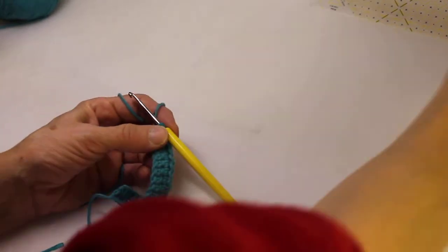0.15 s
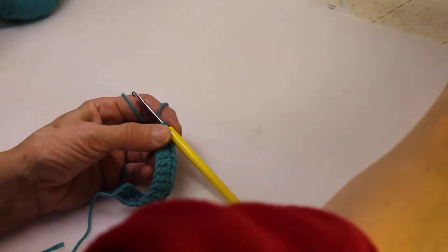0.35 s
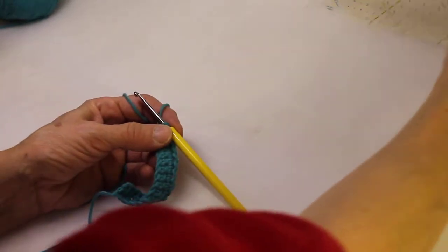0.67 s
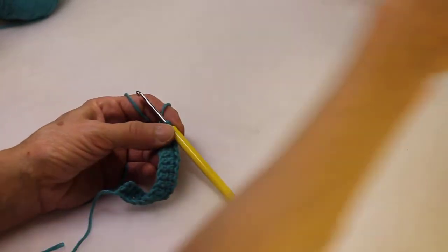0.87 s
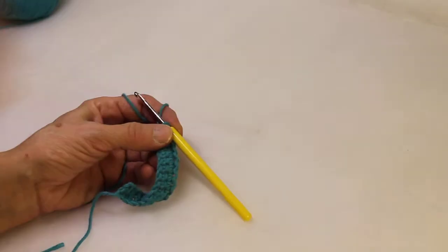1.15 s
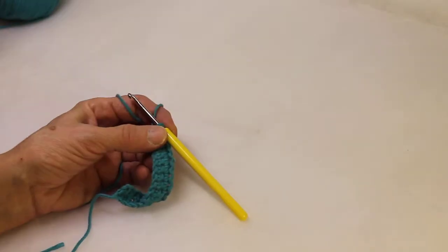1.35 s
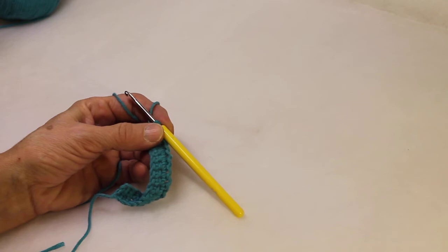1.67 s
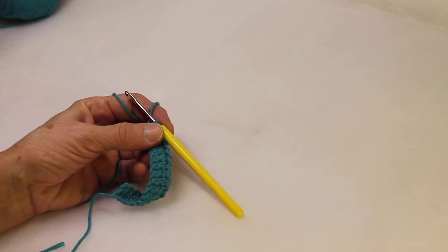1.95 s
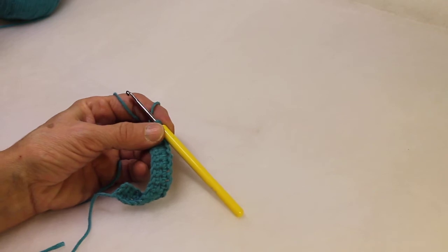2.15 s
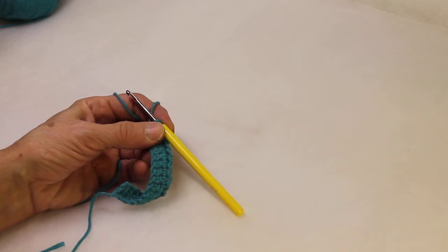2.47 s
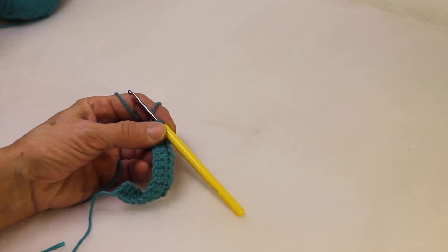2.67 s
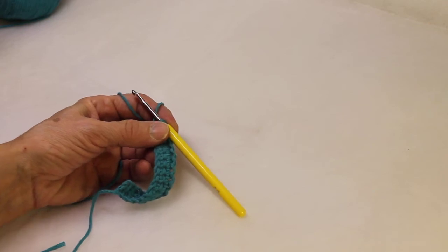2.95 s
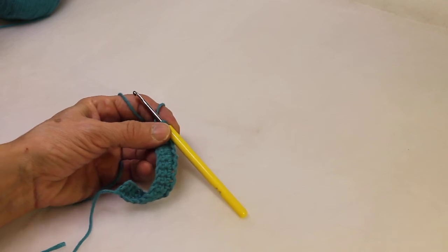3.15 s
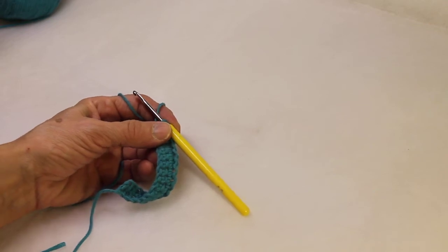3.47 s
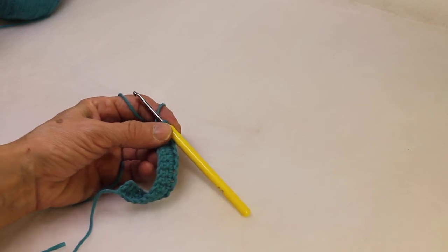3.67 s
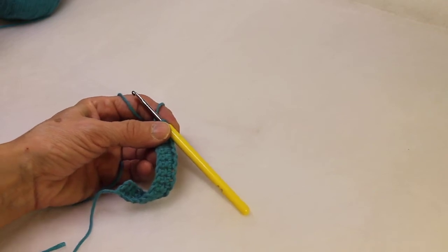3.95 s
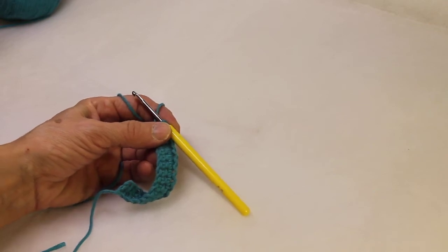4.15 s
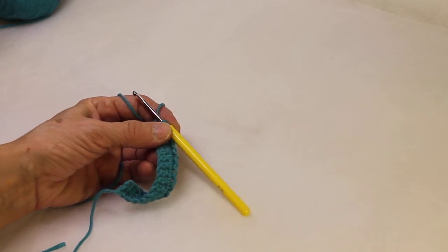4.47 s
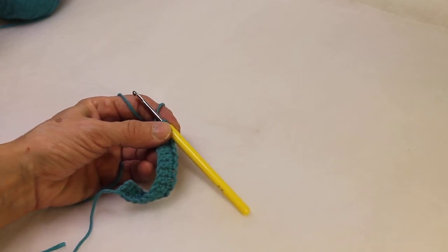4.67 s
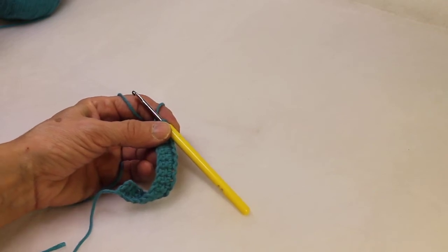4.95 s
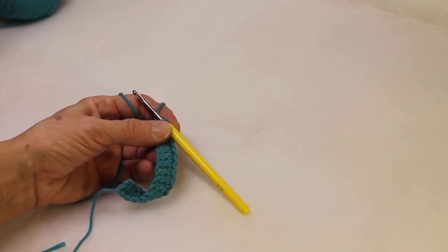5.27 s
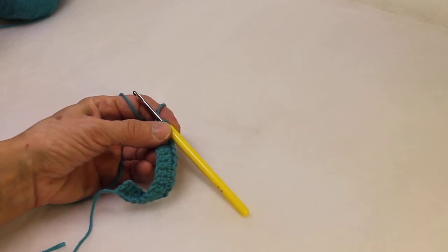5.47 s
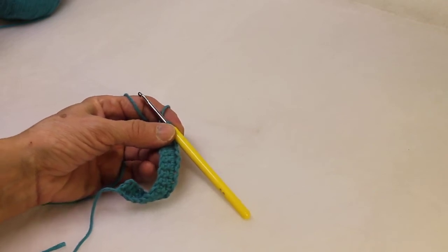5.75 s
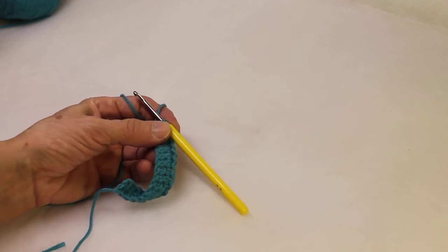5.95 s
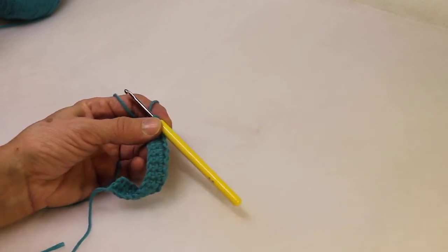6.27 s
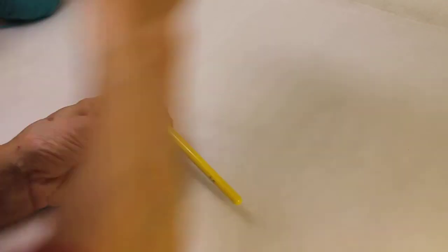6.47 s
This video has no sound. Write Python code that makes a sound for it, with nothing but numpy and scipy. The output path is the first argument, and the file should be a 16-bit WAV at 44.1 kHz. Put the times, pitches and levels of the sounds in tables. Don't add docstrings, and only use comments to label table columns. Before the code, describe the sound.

A microphone on a table picks up dry ticks, brushing fabric and a loud brief plastic catch snap, all very close. The sounds thin into quiet hiss, broken by two hard, roomy knocks with hollow rattling and a bright tiny bounce. A short slide follows, then two duller knocks, soft swelling yarn rustles and scattered little scrapes with short indoor reverberation. It grows nearly still before a last low tap.

```python
import sys
import numpy as np
from scipy import signal
from scipy.io import wavfile
from scipy.ndimage import uniform_filter1d

SR = 44100
rng = np.random.default_rng(int(sys.argv[2]) if len(sys.argv) > 2 else 0)


def transcribe(u):
    v = np.clip(np.atleast_2d(u).T, -1, 1)
    q = np.round(v * 32767).astype(np.int16)
    wavfile.write(sys.argv[1], SR, q)


def nominal_scale(level):
    x = np.asarray(level, float) / 20
    return 10 ** x


N = 291501


def evened(x):
    return x / np.sqrt(np.mean(x ** 2) + 1e-20)


def unit(x):
    return x / np.linalg.norm(x)


def peaked(x):
    return x / np.abs(x).max()


def read(points, hz):
    f, value = np.transpose(points)
    return np.interp(np.log(hz + 1), np.log(f + 1), value)


def add(mix, s, sound):
    part = mix[round(s * SR):][:len(sound)]
    part += sound[:len(part)]


def band(x, low_hz, high_hz):
    edges = [low_hz, min(high_hz, .48 * SR)]
    return signal.sosfilt(signal.butter(2, edges, "bandpass", fs=SR, output="sos"), x)


def ring(hz, t60, seconds=0.18):
    t = np.arange(round(seconds * SR)) / SR
    return nominal_scale(-60 * t / t60) * np.sin(2 * np.pi * hz * t)


def hiss():
    # [f/Hz, level per Hz/dB]
    hiss_colour = [(20, -50), (45, -38), (85, -11.5), (200, -6), (400, -5), (800, -5), (1200, -3),
                   (3000, -11.5), (4300, -18), (9000, -17), (15200, -40.5), (16500, -21)]
    frames, hz = N // 256 + 5, np.fft.rfftfreq(1024, 1 / SR)
    a, b, patches = rng.standard_normal((frames, 513, 3)).T
    patches = uniform_filter1d(patches, size=12, axis=0)
    patches = evened(uniform_filter1d(patches, size=14, axis=1))
    z = (a + 1j * b) * nominal_scale(read(hiss_colour, hz)[:, None] + 1.13 * patches)
    return nominal_scale(-61.5) * evened(signal.istft(z, nperseg=1024, noverlap=768)[1][:N])


def fibre_slips():
    chance = 8000. / SR
    size = nominal_scale(1.8 * np.minimum(rng.exponential(1, N), 5)) * (rng.random(N) < chance)
    clumps = nominal_scale(1.12 * evened(uniform_filter1d(rng.standard_normal(N), size=300)))
    return size * clumps * rng.standard_normal(N)


def three_ranges(slips):
    edges_hz = (190., 1130.0), (900., 6080.0), (5000., 14600.0)
    return [evened(band(slips, *edges)) for edges in edges_hz]


def fibres(ranges, bright_db, drag_db):
    low, middle, high = ranges
    return middle + nominal_scale(bright_db) * high + nominal_scale(drag_db) * low


def cloth(ranges):
    # [t/s, level/dB]
    efforts = [(0, -54), (.1, -56.5), (.3, -61.5), (.75, -61.5), (1.02, -60.5), (1.29, -56.5), (1.5, -61.5),
               (2.18, -66), (2.66, -61), (3.3, -66), (3.55, -65.5), (4.1, -64.5), (4.9, -64.5),
               (5.1, -66.5), (5.4, -66), (5.93, -64.5), (6.4, -58.5), (6.61, -61)]
    effort_db = np.interp(np.arange(N) / SR, *np.transpose(efforts))
    return nominal_scale(effort_db) * fibres(ranges, bright_db=-9.5, drag_db=-0.9)


def sleeve_brushes(slips, ranges):
    # [start t/s, length/s, effort level/dB, brightness level/dB]
    strokes = [(0.037, 0.011, -49, -14), (0.047, 0.052, -59, -16), (0.248, 0.003, -55, -12),
               (0.373, 0.0032, -49, -5), (0.38, 0.063, -58.5, -11), (0.51, 0.016, -63, 0),
               (0.526, 0.036, -57.5, -12), (0.694, 0.011, -54, 0), (0.742, 0.01, -57, -11),
               (0.799, 0.0075, -65, -18), (0.828, 0.029, -61, -3), (1.117, 0.0062, -46.5, 1.5),
               (1.13, 0.05, -50.5, 2), (1.19, 0.01, -46.5, -1), (1.363, 0.0055, -48, -1),
               (1.369, 0.044, -61, -23), (1.445, 0.048, -65, -13), (1.808, 0.037, -66, -11),
               (1.91, 0.007, -55.5, -2), (2.433, 0.0052, -55.5, -7), (3.117, 0.087, -70, -19),
               (4.076, 0.023, -64, -2)]
    # [f/Hz, width/Hz, level/dB]
    answers = [(1646, 59, 4.5), (2640, 22, 2), (5570, 16, -3), (8350, 140, 1), (9240, 47, -6),
               (9900, 41, -17.5)]
    growth_db_per_s = 115
    out, t = np.zeros(N), np.arange(N) / SR
    shell = sum(nominal_scale(db) * evened(band(slips, hz - width / 2, hz + width / 2)) for hz, width, db in answers)
    shell = nominal_scale(-6) * evened(shell)
    for start, length, db, bright_db in strokes:
        since = np.clip(t - start, 0, length) - length / 2
        inside = uniform_filter1d(1. * ((t >= start) & (t <= start + length)), size=250)
        inside = inside * nominal_scale(growth_db_per_s * since)
        drag_db = -13 - 0.49 * bright_db
        out += nominal_scale(db) * inside * (fibres(ranges, bright_db, drag_db) + shell)
    return out


def ticks():
    # [t/s, peak level/dB, pitch f/Hz, treble edge level/dB]
    tick_events = [(0.038, -29.5, 1810, -23), (0.0438, -24.5, 3070, -31), (0.0657, -30.5, 2310, -12),
                   (0.072, -28.5, 2000, -19), (0.196, -34, 3070, -13), (0.2146, -36.5, 2560, -14),
                   (0.2489, -30, 2900, -16), (0.2863, -39, 2910, -22), (0.335, -37, 3000, -21),
                   (0.373, -26.5, 3100, -13), (0.4066, -32, 2870, -15), (0.428, -42, 3850, -18),
                   (0.5104, -51, 4110, 0), (0.5352, -43, 4100, -13), (0.643, -38, 3020, -18),
                   (0.6923, -56, 2260, 2), (0.7004, -48.5, 2670, 2), (0.9287, -42, 2490, -18),
                   (0.947, -41, 2830, -16), (0.9782, -39, 2970, -18), (1.0479, -29, 3000, -15),
                   (1.1165, -35, 2420, -18), (1.211, -34, 2100, -27), (1.316, -41, 2770, -23),
                   (1.9085, -56.5, 3210, 4), (2.4289, -61, 3020, -4)]
    out = np.zeros(N)
    edge = peaked(band(signal.unit_impulse(300), 2300.0, 6700.0))
    for s, db, hz, edge_db in tick_events:
        tone = peaked(band(ring(hz, 0.0046, .02), hz / 3.2, hz * 2.2))
        add(out, s, nominal_scale(db - 1.5) * tone)
        add(out, s, nominal_scale(db + edge_db + 13.0) * edge)
    return out


def thuds():
    # [t/s, peak level/dB, pitch f/Hz, length/s]
    pushes = [(0.067, -40.5, 199, 0.013), (0.124, -43.5, 279, 0.027), (0.208, -35, 305.4, 0.038),
              (0.225, -49, 312.7, 0.089), (0.254, -63, 222, 0.18), (0.259, -50, 105.3, 0.058),
              (0.502, -51.5, 438, 0.037), (0.801, -42, 525, 0.0057), (0.916, -51.5, 216, 0.032),
              (1.492, -49.5, 423, 0.02), (1.947, -57, 567, 0.065), (2.694, -53, 138, 0.044),
              (2.84, -38, 519, 0.041), (2.872, -37.5, 463, 0.025), (3.51, -46, 578, 0.045),
              (4.119, -42, 657, 0.025), (6.461, -47, 334, 0.035), (1.52, -56, 135, 0.049),
              (3.525, -58, 75, .05), (4.132, -55, 75, 0.044)]
    out, t = np.zeros(N), np.arange(SR // 4) / SR
    for s, db, hz, length in pushes:
        rumble = band(rng.standard_normal(len(t)), hz / 5.1, 660.0)
        puff = evened(band(rumble, hz / 5.8, 1650.0))
        shape = peaked((1 - np.exp(-t / 0.0022)) * np.exp(-t / max(length, .005)))
        add(out, s, nominal_scale(db) * shape * (0.65 * np.sin(2 * np.pi * hz * t) + 0.49 * puff))
    return out


def snap():
    # [t/s, peak level/dB]
    snaps = [
        (0.139, -10),
    ]
    # [f/Hz, level/dB, t60/s]
    catch_tones = [(1405, -5, 0.049), (1566, 10, 0.0075), (1876, -13, 0.05), (2100, -7, 0.011),
                   (2870, -20, 0.051), (3700, 3.5, 0.0025), (3700, -28.5, 0.12), (4940, 4, 0.0018),
                   (6900, -20, 0.031), (7170, -8, 0.0087)]
    echo_s, echo_db = 0.0089, -19
    out = np.zeros(N)
    click = sum(nominal_scale(db) * ring(hz, t60) for hz, db, t60 in catch_tones)
    click = peaked(band(band(click, 1500.0, 5760.0), 1350.0, 8000.0))
    for s, db in snaps:
        add(out, s, nominal_scale(db + 5) * click)
        add(out, s + echo_s, nominal_scale(db + echo_db) * click)
    return out


def reverberation():
    # [f/Hz, t60/s]
    room_decay = [(150, 0.05), (500, 0.23), (1500, 0.26), (4000, 0.25), (8000, 0.23), (14000, 0.15)]
    taps_in_time = rng.choice([-1., 1.], SR // 2) * (rng.random(SR // 2) < .3)
    hz, t, z = signal.stft(taps_in_time, SR, nperseg=128)
    dying = z * nominal_scale(-60 * t / read(room_decay, hz)[:, None])
    tail = signal.istft(dying, SR, nperseg=128)[1]
    build_up = 1 - np.exp(-np.arange(len(tail)) / (0.013 * SR))
    return nominal_scale(2.5) * unit(tail * build_up)


def struck_colour(hz, body_db, edge_db):
    # [f/Hz, width/Hz, level/dB]
    body_tones = [(513, 100, -10), (718, 41, 14), (926, 210, 16.5), (1077, 74, 8.5), (1300, 150, 10)]
    impulse = signal.unit_impulse(SR // 20)
    body = sum(nominal_scale(db) * ring(f, np.log(1000) / (np.pi * width), .05) * width for f, width, db in body_tones)
    body = band(body, 540.0, 1300.0)
    tones = ring(hz, 38.0 / hz, .05) + .5 * ring(hz * 1.19, 14.0 / hz, .05)
    middle = band(impulse, 530.0 + 0.22 * hz, 6570.0)
    high = band(impulse, 3500.0, 13600.0)
    colour = nominal_scale(body_db) * unit(body) + 0.92 * unit(np.gradient(tones))
    return colour + nominal_scale(0.5 * edge_db + 5.5) * unit(middle) + nominal_scale(edge_db) * unit(high)


def strike(out, s, db, hz, body_db, edge_db, length, room_db=0):
    # [delay t/s, level/dB]
    walls = [(.0028, -1), (.0047, -6), (.0062, -8), (.017, -9), (.021, -10)]
    t = np.arange(SR // 20) / SR
    scrape = unit(rng.standard_normal(len(t)) ** 3 * t / length * np.exp(-2 * t / length))
    contact = unit(0.00073 / length * signal.unit_impulse(len(t)) + scrape)
    heard = nominal_scale(room_db) * reverberation()
    add(heard, 0, contact)
    for delay, wall_db in walls:
        add(heard, delay * rng.uniform(0.96, 1.0), nominal_scale(wall_db) * contact)
    add(out, s, nominal_scale(db + 4) * signal.fftconvolve(heard, struck_colour(hz, body_db, edge_db)))


def taps():
    # [t/s, strength level/dB, main pitch f/Hz, low body level/dB, high edge level/dB]
    hand_taps = [
        (0.799, -35.5, 606, 3.5, -21),
        (1.955, -41, 1300, 3, -25),
        (6.4605, -24.5, 1357, -13, -36),
    ]
    out = np.zeros(N)
    for row in hand_taps:
        strike(out, *row, length=0.0045, room_db=-4)
    return out


def knocks():
    # [t/s, strength level/dB, main pitch f/Hz, low body level/dB, high edge level/dB]
    hard_knocks = [
        (2.674, -32, 2220, -6, -20),
        (2.681, -20.5, 2000, 4, 7),
        (2.8159, -16, 2210, 7.5, 8),
        (3.515, -27.5, 1880, 1, -10),
        (4.115, -19.5, 1820, -5.5, -46),
        (4.390, -39.5, 1440, 5, 1),
        (5.3, -34, 1190, -9, -22),
        (5.3007, -33, 4000, -23, -12),
    ]
    out = np.zeros(N)
    for row in hard_knocks:
        strike(out, *row, length=0.0005)
    return out


def clatter():
    # [t/s, strength level/dB]
    landings = [
        (2.681, -7.5),
        (2.727, -27),
        (2.8165, -9),
    ]
    # [f/Hz, width/Hz, level/dB]
    hollow_tones = [(859, 32, 3), (1300, 130, 4), (1520, 62, -5), (2000, 61, -5), (2490, 140, -4),
                    (2800, 38, -10), (3380, 71, -1)]
    shell = unit(sum(nominal_scale(db) * unit(ring(hz, 3.8 / max(width, 40.), .06)) for hz, width, db in hollow_tones))
    out = np.zeros(N)
    for s, db in landings:
        heard = reverberation()
        add(heard, 0, np.array([0.8]))
        add(out, s, nominal_scale(db) * signal.fftconvolve(heard, shell))
    return out


def bounces():
    # [t/s, peak level/dB]
    hops = [
        (2.6828, -10.5),
        (2.6854, -82),
        (2.707, -18.5),
        (2.724, -29),
    ]
    out = np.zeros(N)
    tick = peaked(band(ring(12700.0, 0.00078, .01), 8300.0, 13500.0))
    for s, db in hops:
        add(out, s, nominal_scale(db + 2) * tick)
    return out


def yarn_pulls(ranges):
    # [start t/s, length/s, effort level/dB]
    tugs = [
        (2.956, 0.31, -62.5),
        (3.594, 0.23, -51),
        (4.142, 0.28, -56.5),
        (4.313, 0.33, -52.5),
        (4.752, 0.28, -58.5),
        (5.153, 0.14, -66),
    ]
    out, t = np.zeros(N), np.arange(N) / SR
    yarn = fibres(ranges, bright_db=-12, drag_db=-16.5)
    for start, length, db in tugs:
        swell = np.abs(np.sin(np.pi * np.clip((t - start) / length, 0, 1))) ** 1.3
        out += nominal_scale(db) * swell * yarn
    return out


def slides():
    # [t/s, strength level/dB, main pitch f/Hz]
    scrapes = [
        (3.005, -34.5, 1140),
        (3.04, -34.5, 1300),
        (3.119, -33.5, 1480),
        (3.164, -43, 1550),
    ]
    out = np.zeros(N)
    for s, db, hz in scrapes:
        strike(out, s, db, hz, body_db=-1.5, edge_db=-39, length=0.026)
    return out


def scuffs():
    # [t/s, strength level/dB, main pitch f/Hz, high edge level/dB]
    light_scuffs = [(3.6257, -30.5, 1450, -13), (3.636, -35.5, 3670, -1), (3.709, -41, 5070, -17),
                    (3.73, -36, 1720, 0.5), (3.949, -42.5, 3940, -11), (3.977, -41, 1290, -2),
                    (3.994, -38.5, 3520, -0.5), (4.165, -43.5, 1790, -2), (4.229, -38, 3840, -5.5),
                    (4.289, -43, 5340, -9), (4.35, -36, 2370, 2.5), (4.407, -28.5, 3770, -15),
                    (4.454, -40, 4500, 12), (4.494, -35, 2370, -12), (4.526, -34, 3880, 3.5),
                    (4.676, -41, 4940, 5), (4.686, -41, 2940, 9.5), (4.814, -36, 3340, -10.5),
                    (4.882, -31, 4170, -2.5), (5.243, -44.5, 4330, 12.5), (5.209, -43, 1730, -14),
                    (5.428, -49.5, 1370, -4), (5.458, -43, 1690, -2.5), (5.501, -39, 1460, 1)]
    out = np.zeros(N)
    for s, db, hz, edge_db in light_scuffs:
        strike(out, s, db, hz, body_db=-7, edge_db=edge_db, length=0.0044)
    return out


def scene():
    slips = fibre_slips()
    ranges = three_ranges(slips)
    arriving = cloth(ranges) + sleeve_brushes(slips, ranges) + yarn_pulls(ranges)
    arriving += ticks() + snap() + bounces()
    arriving += thuds() + taps() + knocks() + clatter() + slides() + scuffs()
    port = signal.butter(3, 80., "highpass", fs=SR, output="sos")
    return (signal.sosfilt(port, arriving) + hiss())[None]


def top_cut(x):
    return signal.sosfilt(signal.butter(12, 17000, fs=SR, output="sos"), x)


def record(dry):
    heard = signal.sosfilt(signal.butter(6, 16200., fs=SR, output="sos"), dry)
    return top_cut(heard)


dry = scene()
out = record(dry)
transcribe(out)
```